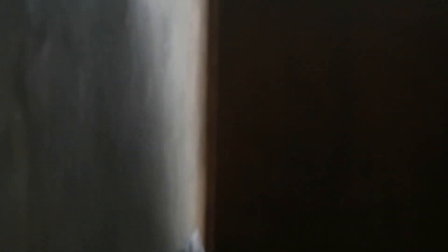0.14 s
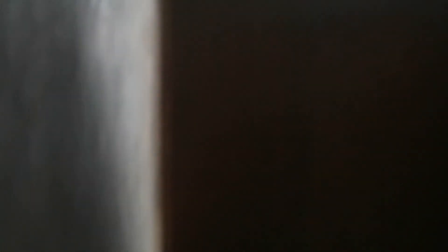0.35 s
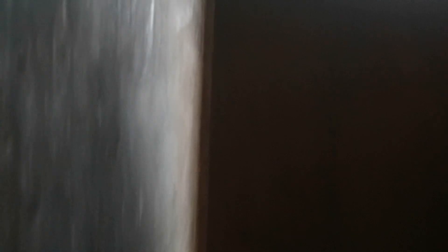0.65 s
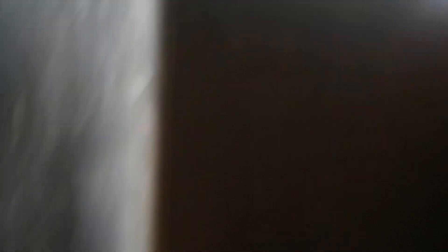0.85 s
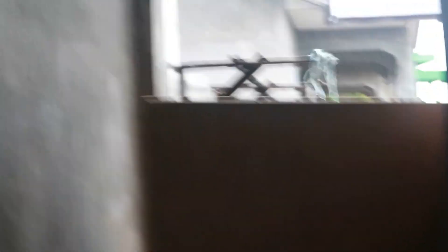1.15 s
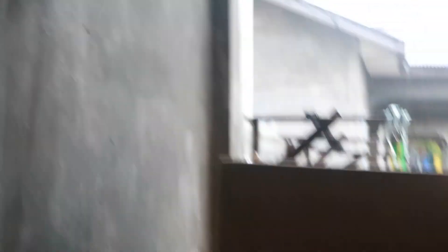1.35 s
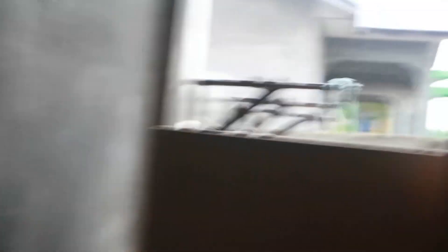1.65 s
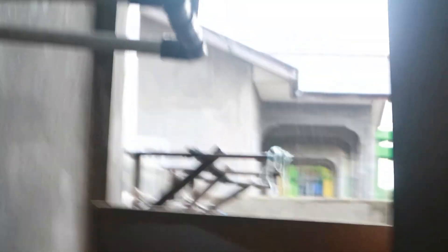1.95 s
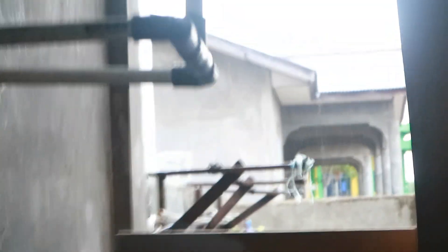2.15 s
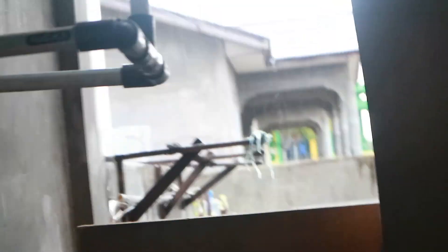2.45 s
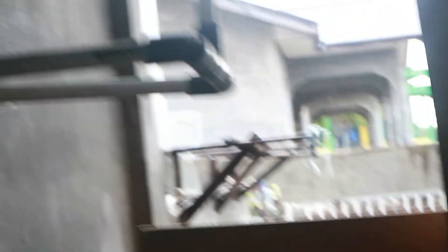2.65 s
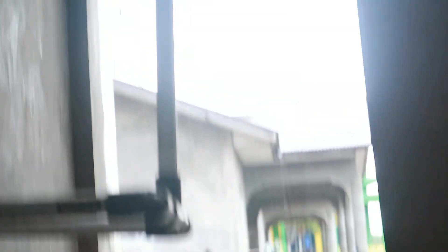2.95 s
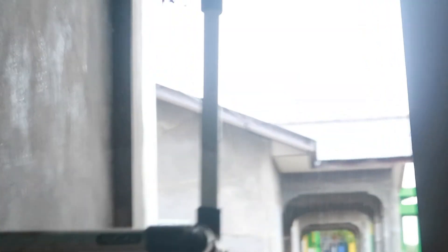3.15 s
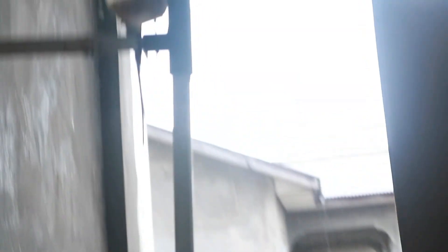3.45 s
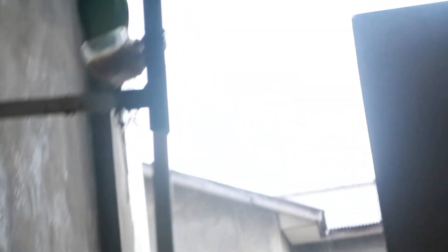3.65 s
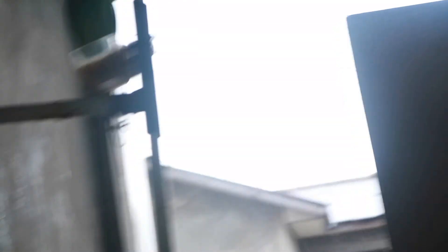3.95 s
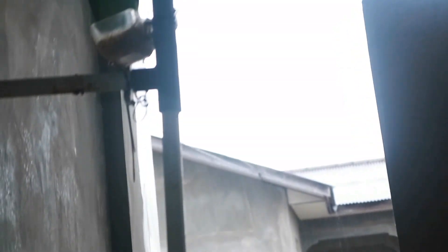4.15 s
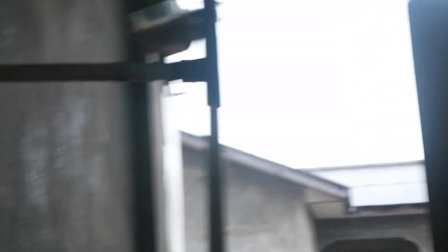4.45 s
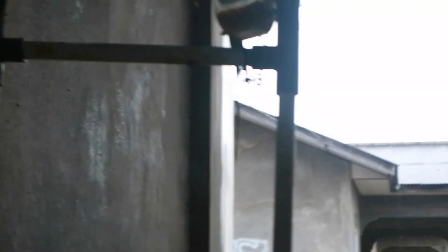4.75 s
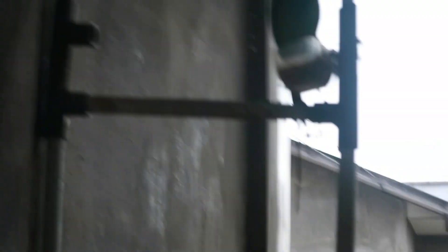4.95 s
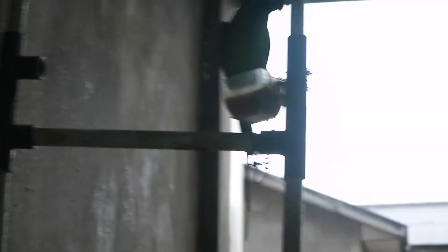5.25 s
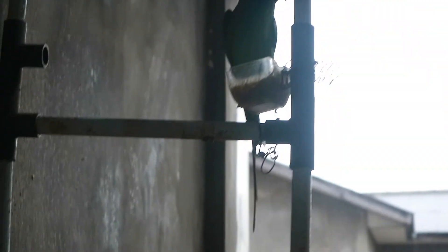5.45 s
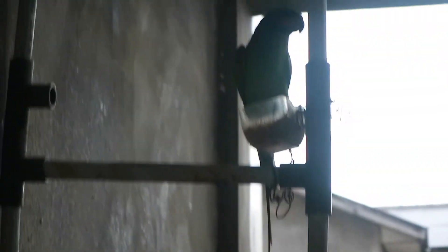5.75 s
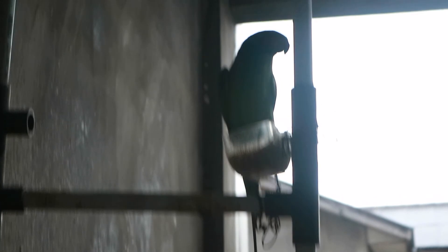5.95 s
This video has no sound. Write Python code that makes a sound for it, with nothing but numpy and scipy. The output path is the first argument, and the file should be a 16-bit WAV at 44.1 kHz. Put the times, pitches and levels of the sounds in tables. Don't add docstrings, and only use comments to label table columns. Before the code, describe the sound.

A hand settles on the camera with a soft low rumble at 0-0.2 s, over faint town hiss and a far idling engine. A nearby parakeet squawks loudly at 0.1, 0.65, 1.1 and 1.75 s, then again after a pause at 2.9 s. Each cry lasts about a quarter second: hoarse attack, quick rise to roughly 1 kHz with strong bright overtones, a brief hold, then a drop and ragged fade into short hard-wall echo. The third is softer. Small ticks fall near 0.25, 1.6 and 2.2 s, and a tiny far chirp at 2.65 s. Automatic gain presses the background down during the cries; it recovers by 3.5 s. From then on, quiet hiss, sparse dry clicks at 3.6, 4.0, 4.5, 4.8 and 6.05 s, and a low engine growing from 4.6 s. Stereo leans right.

```python
import sys
import numpy as np
from scipy import signal
from scipy.fft import rfft, irfft, next_fast_len
from scipy.io import wavfile
from scipy.ndimage import uniform_filter1d, minimum_filter1d, map_coordinates

SR = 44100
rng = np.random.default_rng(int(sys.argv[2]) if len(sys.argv) > 2 else 0)


def master_out(mix):
    frames = np.transpose(np.atleast_2d(mix))
    ceiling = np.clip(frames, -1, 1)
    pcm = np.round(ceiling * 32767).astype(np.int16)
    wavfile.write(sys.argv[1], SR, pcm)


def natural_amplitude(level_db):
    exponent = np.asarray(level_db, float) / 20
    return 10 ** exponent


N = 268304

# t/s, time until drop/s, length/s, level/dB, hoarse start/s
SQUAWKS = [
    (0.115, 0.11, 0.24, -22, 0.017),
    (.639, 0.13, 0.23, -22.5, 0.014),
    (1.091, .13, 0.26, -24, 0.016),
    (1.731, .12, 0.23, -22, 0.012),
    (2.928, .128, 0.26, -22, 0.0093),
]
# start f/Hz, risen f/Hz, sagged f/Hz, pushed f/Hz, dropped f/Hz
PITCH_HZ = [(935, 1030, 1050, 1060, 852), (930, 1008, 964, 974, 862), (815, 970, 932, 960, 824),
            (820, 937, 922, 934, 815), (790, 900, 852, 888, 784)]
# overtone 1 level/dB, overtone 2 level/dB, open beak tilt/(dB/octave), drop/s, droop after it/Hz
COLOUR = [(1.5, -3.5, 1, .039, 2.8), (2.1, -3.5, 1.3, .035, 56.2), (-1.4, -1.5, 0.8, .033, 1.6),
          (-1.7, 2, 2.5, .048, 1.7), (-0.5, -0.3, 1.5, 0.04, 1.4)]
# f/Hz, level/dB
THROAT = [(1500, -8), (1900, 16), (2600, 0.5), (3000, -2.5), (3300, -8.5), (3900, 2), (4800, -6.5),
          (5800, -5), (7000, -18.5), (8500, -18.5), (11000, -33.5), (13500, -41), (15500, -45)]
# f/Hz, level/dB
LOW_THROAT = [(780, -9), (900, -10.5), (1060, -11.5), (1600, -12), (1800, -6.5), (2100, -5)]
# f/Hz, t60/s
PORCH_T60 = [(300, 0.12), (1000, 0.4), (3000, 0.41), (6000, 0.34), (12000, 0.27)]
# t/s, peak level/dB, f/Hz, ring/s
TICKS = [(.252, -27, 500, .02), (1.626, -30, 4000, .003), (2.172, -32, 1100, .03), (2.172, -34, 2300, .006),
         (3.618, -37, 2500, .004), (4.005, -36, 950, .04), (4.524, -32, 3700, .006),
         (4.811, -30, 3300, .009), (4.812, -31, 4000, .009), (4.906, -38, 3500, .003),
         (6.06, -42, 4700, .012)]
# t/s, f/Hz, level/dB
CHIRP = [(2.654, 4800, -70), (2.662, 4920, -46.5), (2.69, 4660, -68), (2.72, 5000, -70)]
# t/s, length/s, firing f/Hz, level/dB
ENGINE = [
    (0, 0.81, 49, -74.5),
    (0.958, 0.91, 56, -82),
    (2.105, 0.91, 50, -74.5),
    (4.6, .8, 40, -64),
    (5.397, .9, 49, -58.5),
]
# multiple of firing f, level/dB
EXHAUST = [(2, -19.5), (3, 4), (4, -21), (5, -7)]
# f/Hz, level/(dB per Hz)
HISS = [(50, -80), (150, -23), (250, -16.5), (347, -11.5), (474, -4.5), (742, 0), (1220, -4.5), (1480, -3),
        (2130, -5.5), (3000, -11.5), (4390, -19.5), (4870, -19), (9390, -34), (13300, -46), (15500, -74)]
# f/Hz, level/(dB per Hz)
RUMBLE = [(15, -75), (25, -50), (60, -32), (85, -11), (124, -4), (200, -2.5), (350, -3.5), (460, 4),
          (770, -120)]
# t/s, level/dB
GAIN = [(0, 0), (.14, 0), (.33, -5.5), (.7, -5.5), (.9, -11), (1.4, -7), (2.2, -7.5), (2.9, -2.5),
        (3.5, -0.5), (6.08, 0.5)]
# f/Hz, level/dB, likeness/0-1, lag at wall/rad, lag at yard/rad
PORTS = [(30, 2, .6, 1.6, 1.6), (70, 2.5, .93, .8, 1.3), (200, -.5, .93, .8, 1.7), (500, -5.5, .9, 1.1, 2),
         (1000, -10, .7, 1.3, 3.2), (2000, -10.5, .35, 1.8, 4.1), (4000, -7.5, .35, 2.9, 3.6),
         (8000, -7.5, .25, 3, 3.1), (15000, -10, .3, 3.1, 3.1)]
# t/s, direction/(0 wall - 1 yard)
AIM = [(0, .7), (2, .6), (2.4, .05), (4.5, .05), (4.9, .95), (6.08, .95)]

RISE_S, PUSH_S = .042, .03
RISEN_HALFWAY, FALLEN_HALFWAY = .68, .4
WORN = 0.039
ONSET_DB, ATTACK_S, BURST_DB, BURST_S, SAG_DB = -12, 0.01, 2.5, 0.025, 0
DROPPED_DB, RELEASE_S, END_DB = -3, 0.056, -12.5
SHUT_DB_PER_OCTAVE, OPENING_S = -7.5, .012
TOWN_DB, RUMBLE_DB, RUMBLE_GAIN_RATIO = -36.5, -62.5, 1.5
SWELL_S, SHIFT_S, ROAD_DB = 0.081, 0.3, 8
GRIP_DB, GRIP_S, GRIP_FADE_S = -49, 0.074, 0.11


def squawk(start, drop, length, level_db, lock_s, start_hz, risen_hz, sagged_hz, pushed_hz, low_hz,
           first_db, second_db, open_db, fall, droop):
    t = np.arange(0, length, 1 / SR)
    mid_rise_hz = start_hz + RISEN_HALFWAY * (risen_hz - start_hz)
    mid_fall_hz = pushed_hz - FALLEN_HALFWAY * (pushed_hz - low_hz)
    hz = np.interp(t, [0, RISE_S / 2, RISE_S, drop - PUSH_S, drop, drop + fall / 2, drop + fall, length],
                   [start_hz, mid_rise_hz, risen_hz, sagged_hz, pushed_hz, mid_fall_hz, low_hz, low_hz - droop])
    db = level_db + np.interp(t, [0, ATTACK_S, BURST_S, 2 * BURST_S, drop, length - RELEASE_S, length],
                              [ONSET_DB, 0, BURST_DB, 0, SAG_DB, DROPPED_DB, END_DB])
    beak_db = np.interp(t, [0, OPENING_S], [SHUT_DB_PER_OCTAVE, open_db])

    worn = WORN * np.clip((t - drop) / fall, 0, 1)
    hoarse = np.clip(.035 + worn + .95 * np.exp(-(t / lock_s) ** 2), 0, 1)
    tiring = np.exp((t - t[-1]) / 0.06)
    shake = 0.0024 * wobble(41.7, len(t)) + (0.00038 + 0.033 * tiring) * wobble(201.1, len(t))
    smooth_hz = uniform_filter1d(hz, size=500, mode="nearest")
    phase = 2 * np.pi * np.cumsum(smooth_hz * (1 + shake)) / SR

    def partial(k):
        smear = 1 - hoarse + hoarse * wobble(1100, len(t))
        flutter_db = 3.9 * wobble(26.5, len(t)) + 1.33 * wobble(66.5, len(t))
        return natural_amplitude(flutter_db) * smear * np.sin(k * phase + rng.normal(0, 1.0))

    upper = sum(natural_amplitude(along(THROAT, k * hz) + beak_db * np.log2(k / 4)) * partial(k) for k in range(3, 18))
    upper = upper / np.sqrt(np.abs(uniform_filter1d(upper ** 2, size=1800)) + 1e-9)
    lower = sum(natural_amplitude(along(LOW_THROAT, k * hz) + own_db) * partial(k)
                for k, own_db in enumerate([first_db, second_db], 1))
    edge = np.clip(np.minimum(t - t[0], (t[-1] - t) / 4) / 0.0037, 0, 1)
    return (upper + lower) * natural_amplitude(db + 2.5) * edge


def parakeet():
    out = np.zeros((2, N))
    for row, pitch, colour in zip(SQUAWKS, PITCH_HZ, COLOUR):
        add(out, porch(squawk(*row, *pitch, *colour), wet_db=1.37), row[0])
    return out


def ticks():
    out, t = np.zeros((2, N)), np.arange(SR // 10) / SR
    for s, db, hz, ring in TICKS:
        decay = natural_amplitude(db + 6 - 60 * t / ring)
        tick = decay * np.sin(2 * np.pi * hz * t) * (1 - np.exp(-t * hz / 1.5))
        tick[:2] = natural_amplitude(db - 11) * (ring < .008)
        add(out, porch(tick, wet_db=-15), s)
    return out


def far_chirp():
    out, start = np.zeros((2, N)), CHIRP[0][0]
    hz, db = curves(CHIRP, start + np.arange(SR // 15) / SR)
    chirp = natural_amplitude(db) * wobble(520, len(hz)) * np.sin(2 * np.pi * np.cumsum(hz) / SR)
    add(out, porch(chirp, wet_db=4.0), start)
    return out


def town():
    t = np.arange(N) / SR
    gain_db, = curves(GAIN, t)
    start, length, rate_hz, _ = np.transpose(ENGINE)
    knots = np.ravel([start + SHIFT_S, start + length - SHIFT_S], "F")
    hz = np.interp(t, knots, np.repeat(rate_hz, 2))
    near = sum(natural_amplitude(db) * np.clip(np.minimum(t - s, s + span - t) / SWELL_S, 0, 1) for s, span, _, db in ENGINE)
    phase = 2 * np.pi * np.cumsum(hz * (1 + .005 * wobble(4, N))) / SR
    engine = sum(near * natural_amplitude(4 + order_db + .8 * wobble(5, N)) * np.sin(k * phase) for k, order_db in EXHAUST)

    hiss = natural_amplitude(TOWN_DB + gain_db + 0.43 * wobble(3.65, N)) * rush(HISS, patchy_db=0.98)
    grip = natural_amplitude(GRIP_DB) * np.exp(-((t - GRIP_S) / GRIP_FADE_S) ** 2)
    bass = natural_amplitude(RUMBLE_DB + RUMBLE_GAIN_RATIO * gain_db) + natural_amplitude(ROAD_DB) * near + grip
    rumble = bass * natural_amplitude(0.6 * wobble(2.46, N)) * rush(RUMBLE, patchy_db=0.0)
    return hiss + rumble + engine * [[1], [0]]


def rush(spectrum, patchy_db):
    z = signal.stft(rng.standard_normal((2, N)), nperseg=512)[2]
    field = uniform_filter1d(uniform_filter1d(rng.standard_normal(z.shape[1:]), 6, 0), 14, 1)
    pair = signal.istft(z * natural_amplitude(patchy_db * unit(field)), nperseg=512)[1][:, :N]
    return unit(filtered(pair, lambda hz: natural_amplitude(along(spectrum, hz))))


def porch(x, wet_db, gap_s=.003):
    hz, t, z = signal.stft(rng.standard_normal((2, SR // 2)), SR, nperseg=256)
    decay = natural_amplitude(-60 * t / along(PORCH_T60, hz)[:, None])
    tail = signal.istft(z * decay, SR, nperseg=256)[1]
    path = natural_amplitude(wet_db) * np.pad(tail / np.linalg.norm(tail[0]), ((0, 0), (round(gap_s * SR), 0)))
    path[:, 0] = 1, 1.1
    return signal.fftconvolve(x[None], path, axes=1)


def unit(x):
    return x / np.sqrt(np.mean(x ** 2) + 1e-20)


def along(points, hz):
    f, *cols = np.transpose(points)
    return np.squeeze([np.interp(np.log(hz + 1), np.log(f + 1), c) for c in cols])


def curves(rows, t):
    s, *cols = np.transpose(rows)
    return [np.interp(t, s, c) for c in cols]


def wobble(rate_hz, size):
    return map_coordinates(rng.standard_normal(512), [np.arange(size) * rate_hz / SR], mode="wrap")


def filtered(x, response):
    m = next_fast_len(N + 8192)
    return irfft(rfft(x, m) * response(np.fft.rfftfreq(m, 1 / SR)), m)[..., :N]


def add(out, x, s):
    part = out[:, round(s * SR):][:, :x.shape[1]]
    part += x[:, :part.shape[1]]


def scene():
    return parakeet() + ticks() + far_chirp() + town()


def masked(x, near_db, far_db, left_db):
    z = signal.stft(x, nperseg=1024)[2]
    edges = np.r_[np.unique(np.geomspace(8, 110, num=30).astype(int)), 118:513:9, 513]
    widths = np.diff(edges)
    band = np.add.reduceat(np.abs(z) ** 2, edges[:-1], axis=1) / widths[:, None]
    band = uniform_filter1d(band, size=4, axis=2)
    luck = natural_amplitude(14 * uniform_filter1d(rng.standard_normal(band.shape[1:]), size=5, axis=1))
    near = -minimum_filter1d(-band, size=7, axis=1)
    under_neighbour = band * luck < near * natural_amplitude(2 * near_db)
    under_loudest = band * luck < band.max(1, keepdims=True) * natural_amplitude(2 * far_db)
    hidden = under_neighbour | under_loudest
    hidden[:, edges[:-1] < 44] = False
    gain = np.repeat(np.where(hidden, natural_amplitude(left_db), 1), widths, axis=1)
    z = z * np.pad(gain, ((0, 0), (edges[0], 0), (0, 0)), constant_values=1)
    return signal.istft(z, nperseg=1024)[1][:, :N]


def top_cut(x):
    return signal.sosfilt(signal.butter(12, 15760, fs=SR, output="sos"), x)


def record(dry):
    aim = np.clip(curves(AIM, np.arange(N) / SR)[0], 0, 1)

    def left(hz, side):
        db, alike, *lag = along(PORTS, hz)
        alike = np.clip(alike, 0, 1)
        return natural_amplitude(db) * np.array([alike * np.exp(-1j * lag[side]), np.sqrt(1 - alike ** 2)])

    wall, yard = (filtered(dry, lambda hz: left(hz, side)) for side in range(2))
    left_port = (1 - aim) * wall.sum(0) + aim * yard.sum(0)
    mix = masked(np.array([left_port, dry[0]]), near_db=-23, far_db=-45, left_db=-26)
    return top_cut(mix)


dry = scene()
out = record(dry)
master_out(out)
```